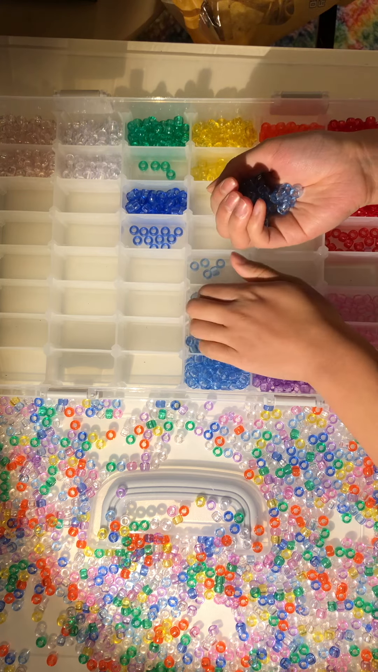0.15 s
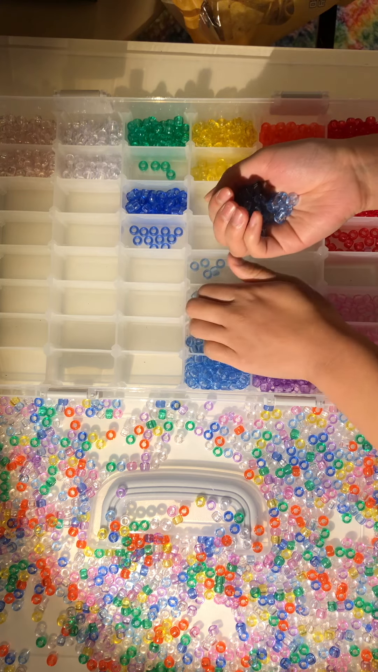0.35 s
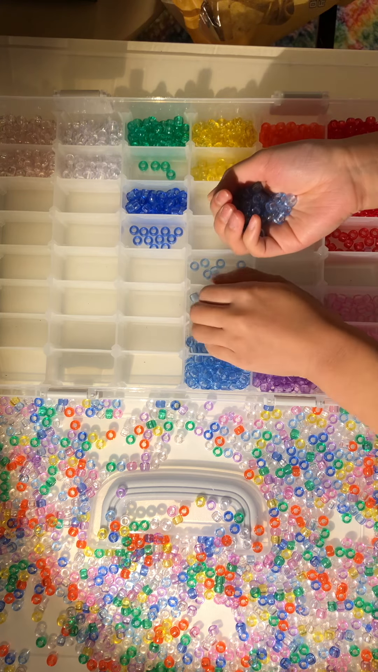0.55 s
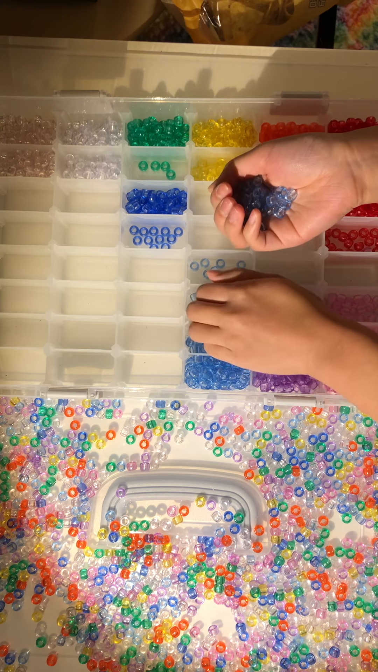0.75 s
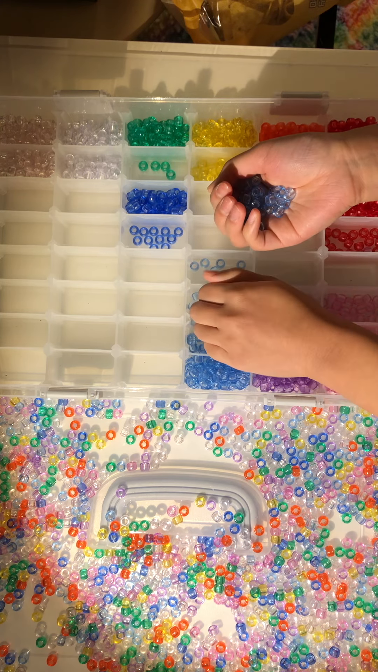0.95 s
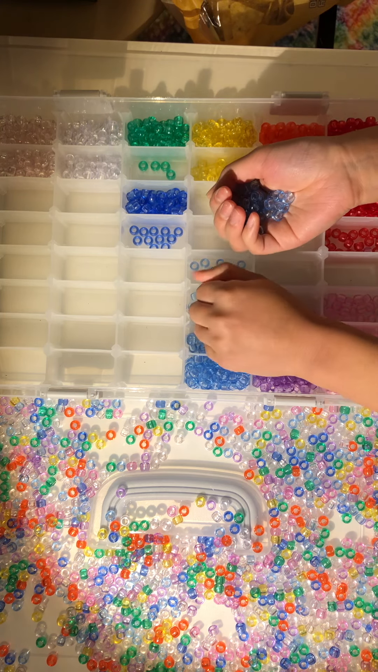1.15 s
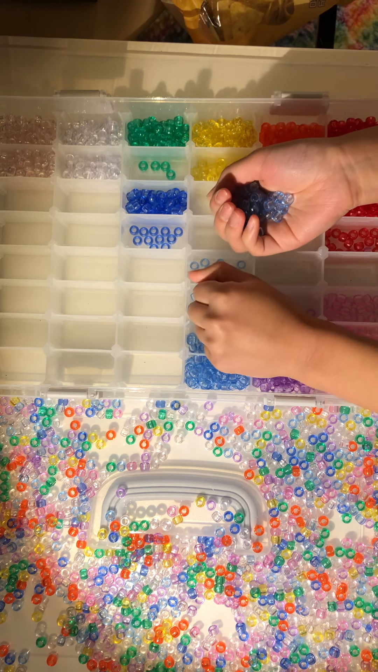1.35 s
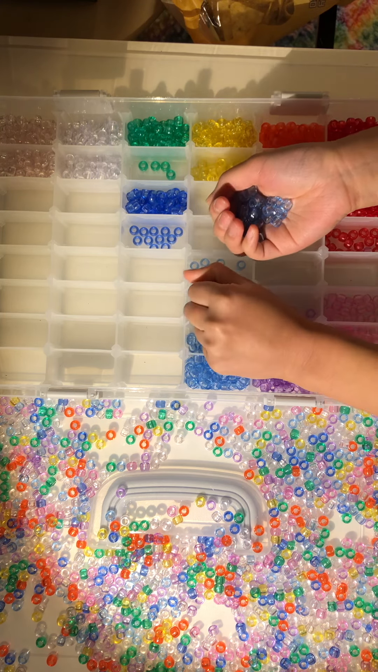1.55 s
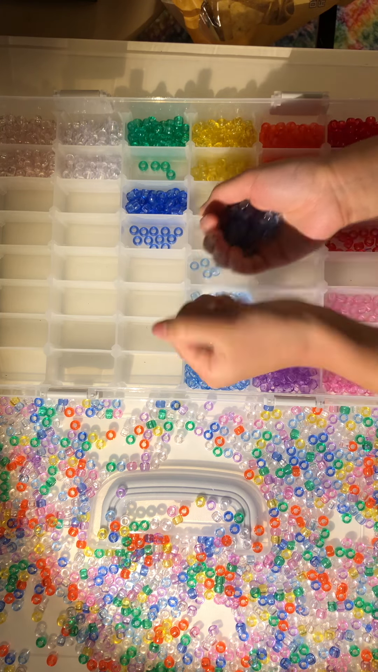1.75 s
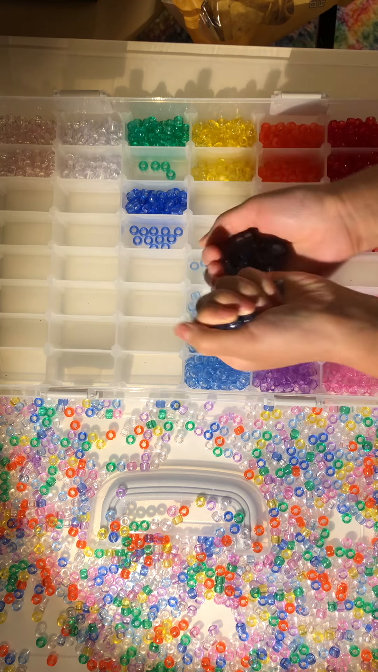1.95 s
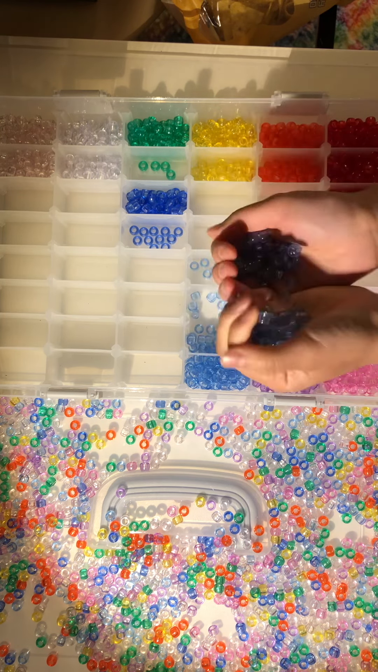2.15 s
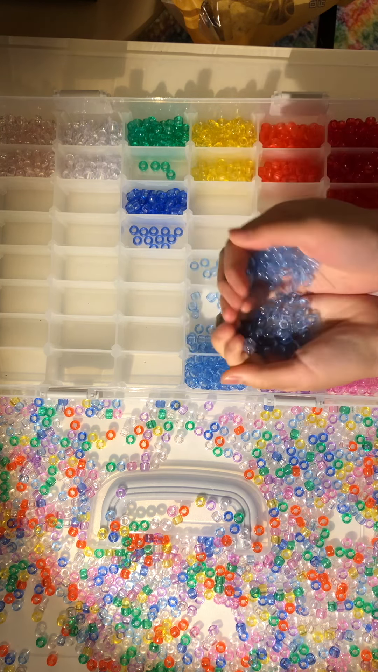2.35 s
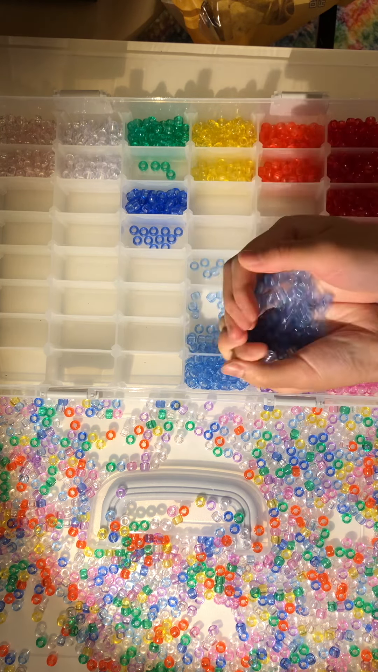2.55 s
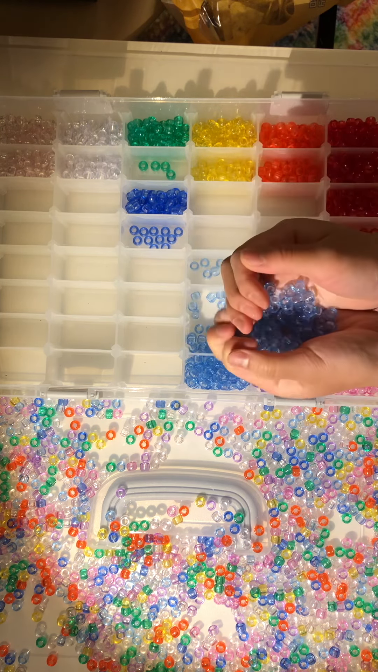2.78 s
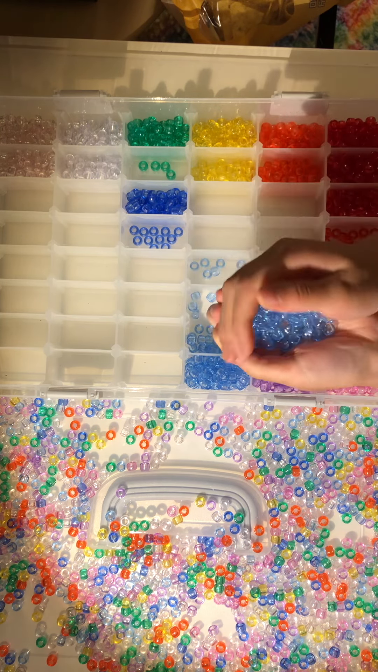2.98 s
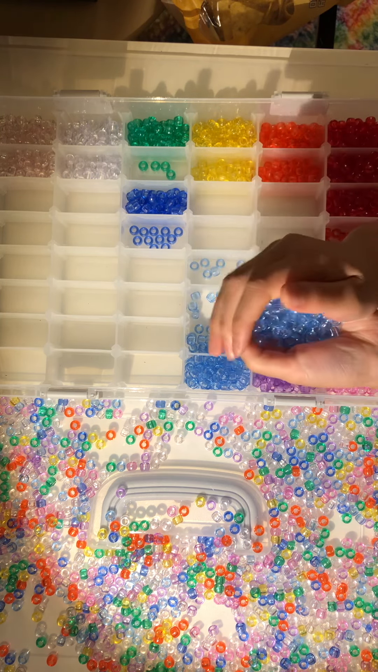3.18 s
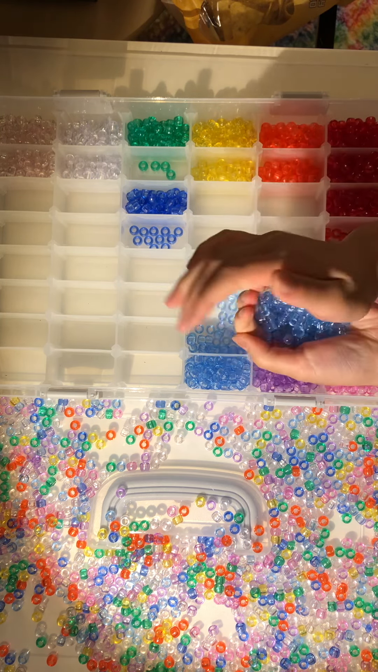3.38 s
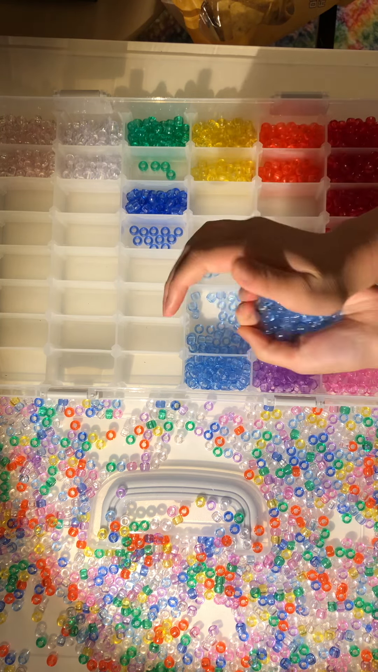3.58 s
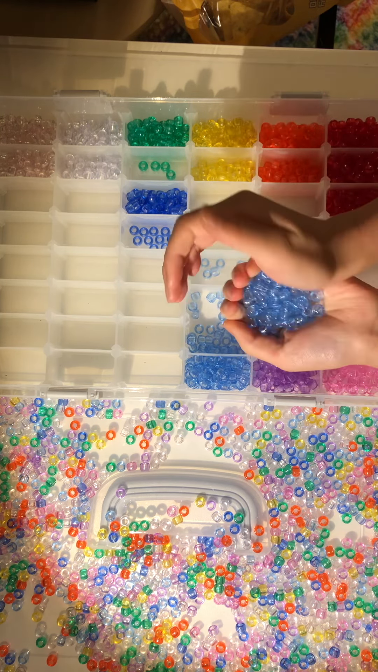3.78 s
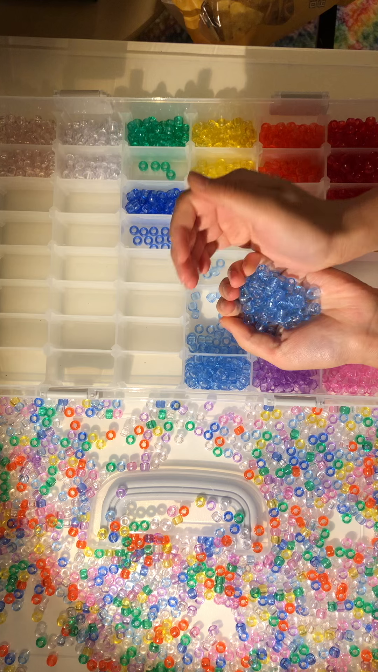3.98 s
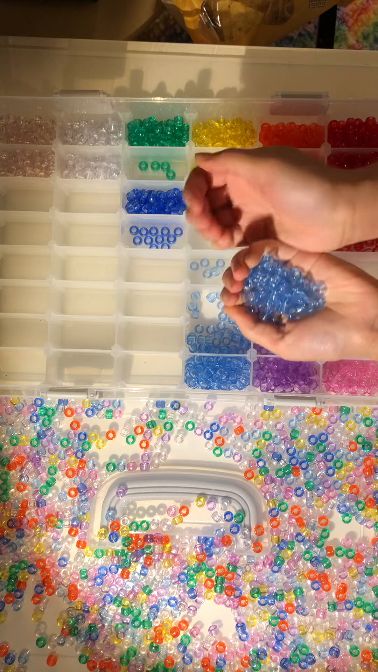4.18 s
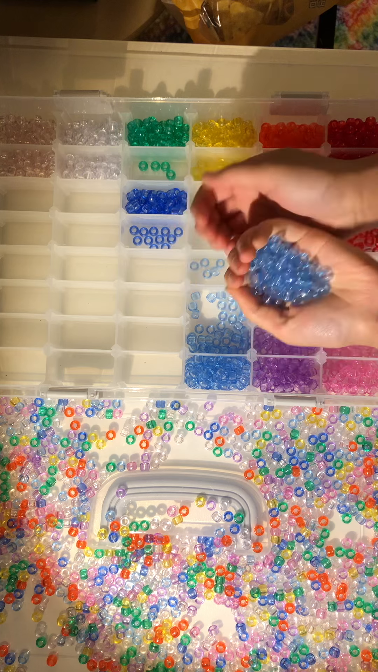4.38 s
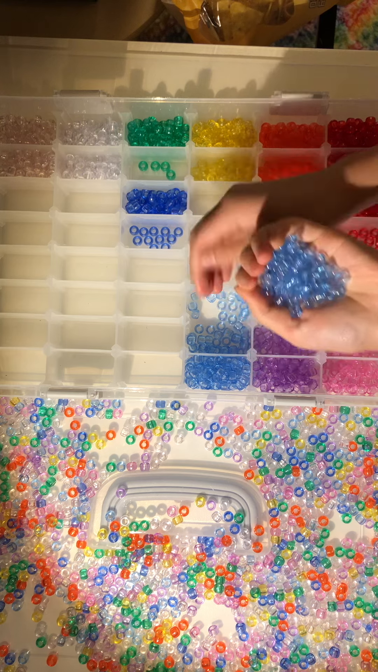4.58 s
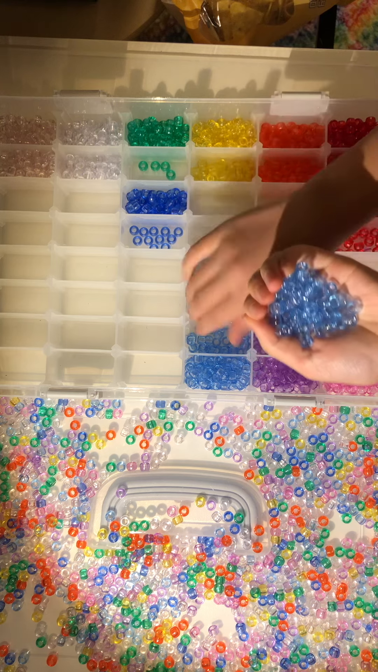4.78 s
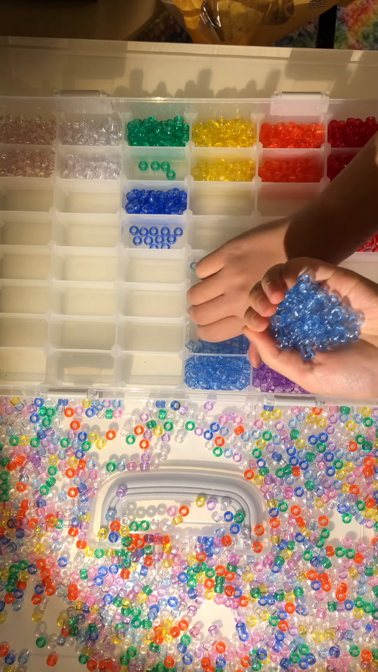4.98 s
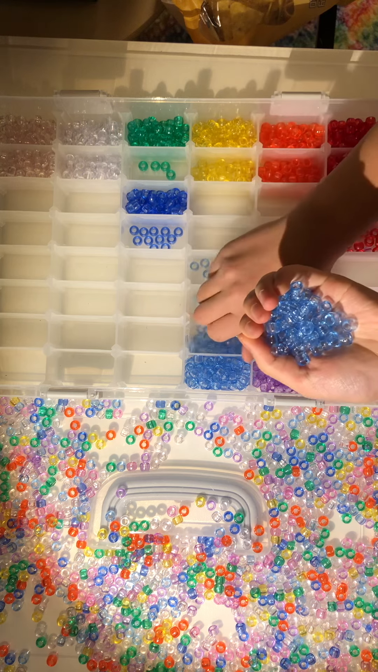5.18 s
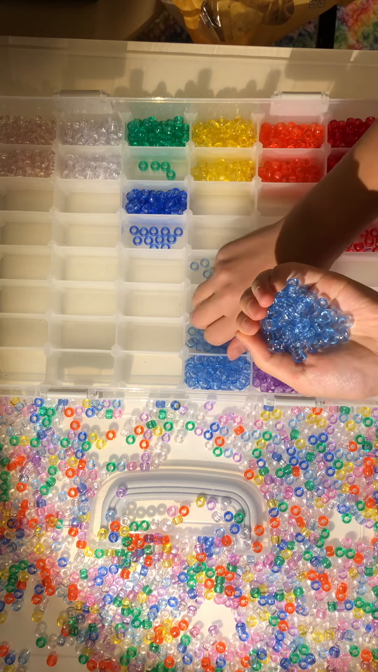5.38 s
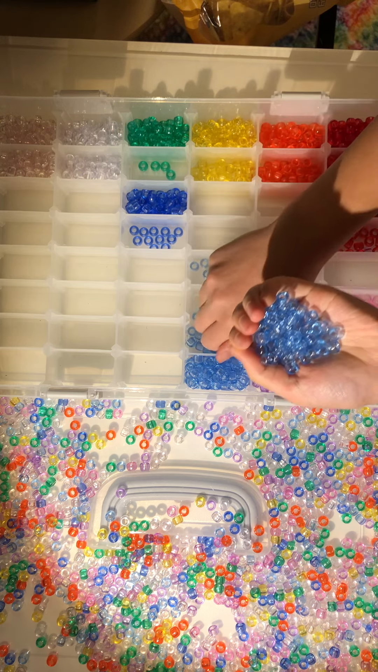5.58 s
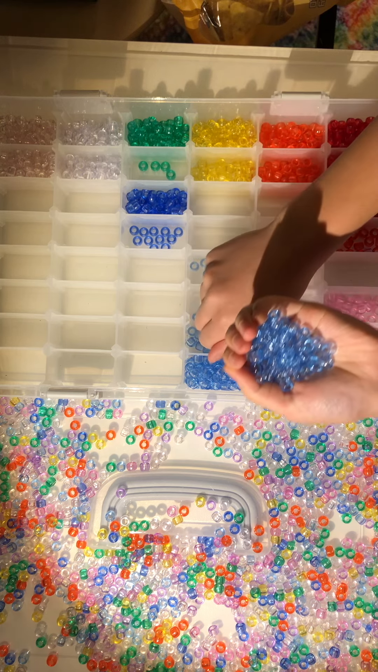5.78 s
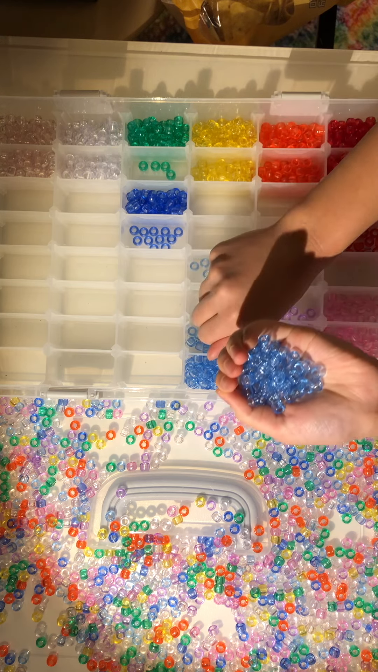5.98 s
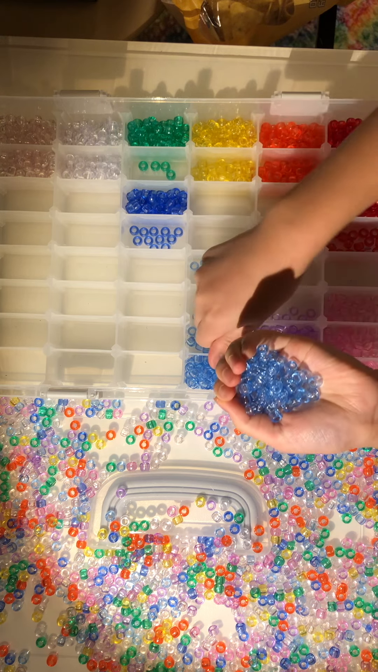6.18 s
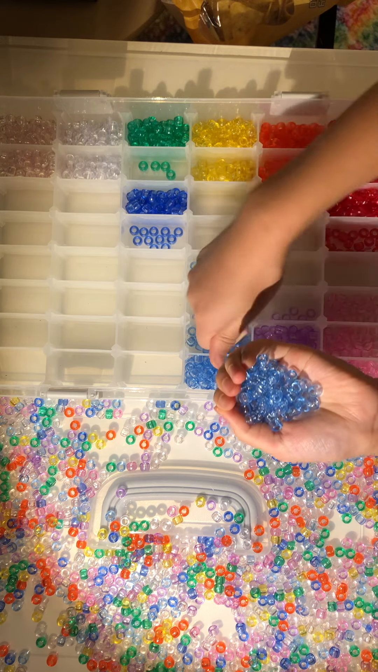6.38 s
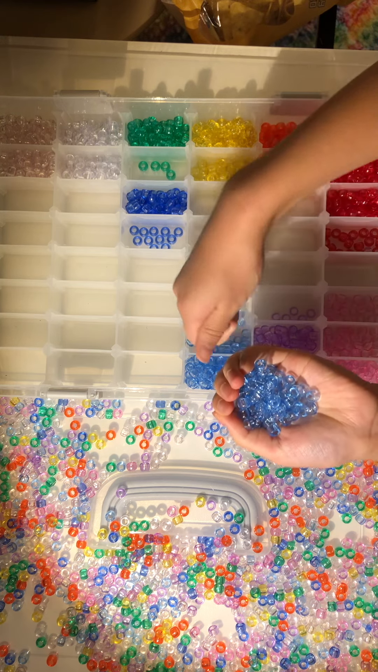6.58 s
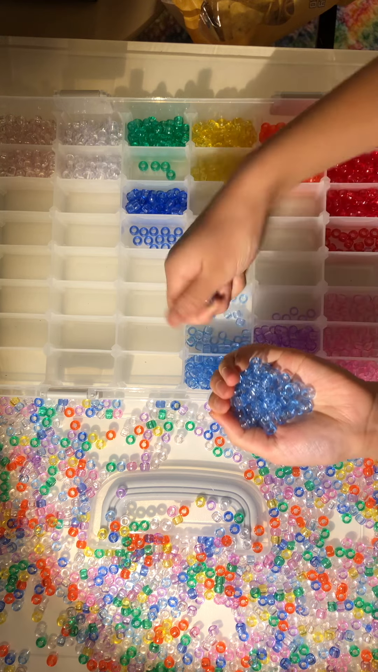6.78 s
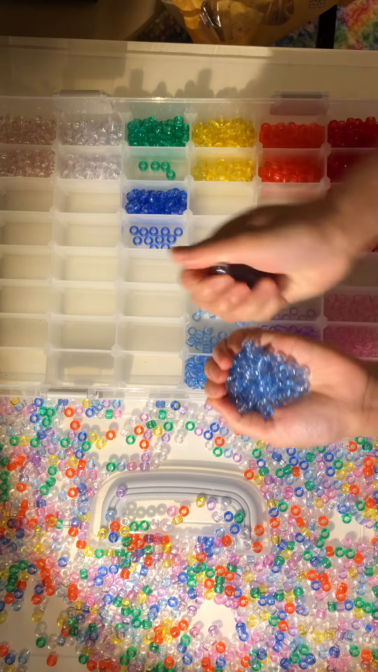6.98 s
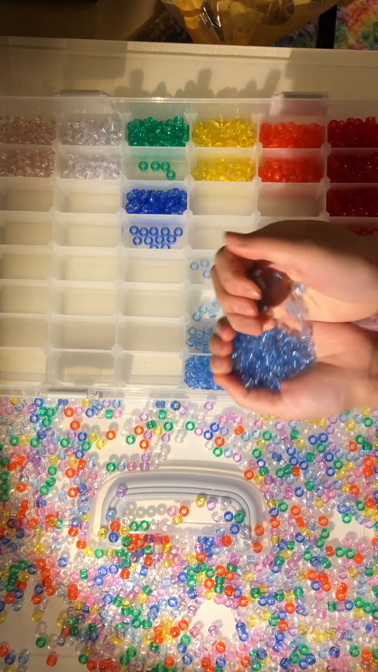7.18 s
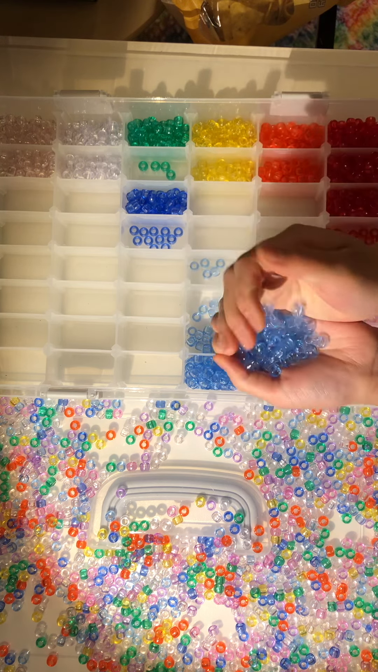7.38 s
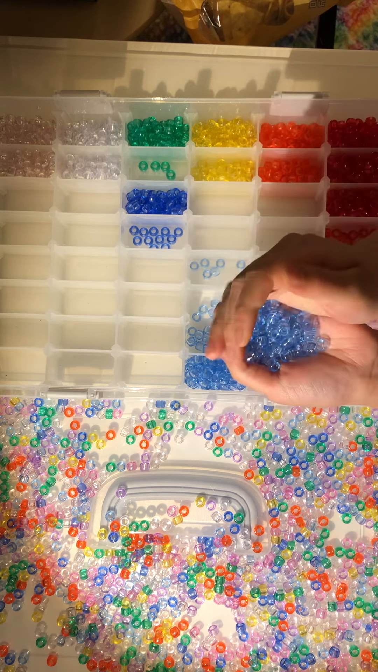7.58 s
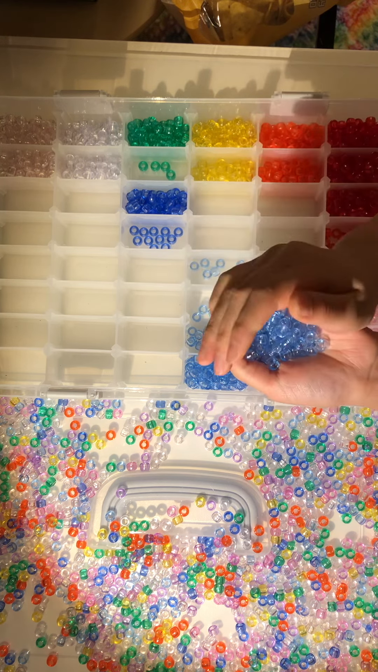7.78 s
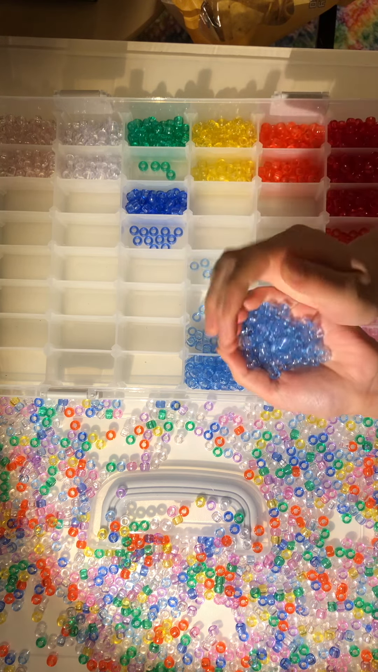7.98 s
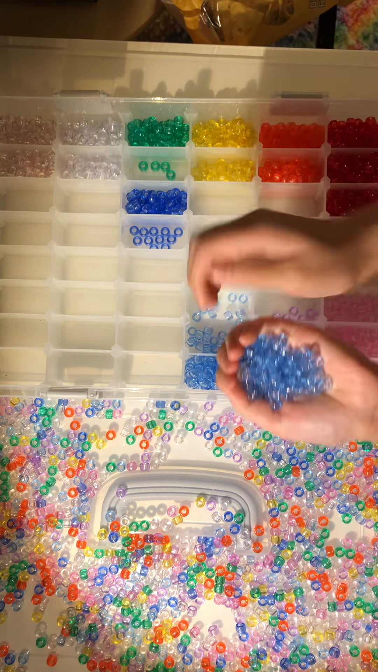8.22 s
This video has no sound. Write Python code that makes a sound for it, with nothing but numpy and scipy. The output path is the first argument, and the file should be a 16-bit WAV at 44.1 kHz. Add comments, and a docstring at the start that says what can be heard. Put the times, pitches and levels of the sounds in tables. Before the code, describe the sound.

Small plastic beads click and rattle as fingers rake them from a thin plastic box, then trickle softly between cupped palms in a quiet room.

```python
"""In a small quiet room, fingers dig small plastic beads out of a thin box's compartments and pour them between palms.
Each contact is a bright noise tick; beads that strike the box also send a noise knock through its wall resonances.
Swarms of small contacts fill in the raking and pouring, and skin rubs along the box.
The hand bumps the table now and then; short diffuse tails answer the beads, over hiss and a faint wavering hum."""
import sys
import numpy as np
from scipy import signal
from scipy.fft import rfft, irfft, next_fast_len
from scipy.io import wavfile

SR = 44100
rng = np.random.default_rng(int(sys.argv[2]) if len(sys.argv) > 2 else 0)


def dump(signal):
    """Clip the signal to [-1, 1] and save it as 16-bit WAV at the path in sys.argv[1]."""
    limited = np.clip(np.atleast_2d(signal).T, -1, 1)
    pcm = np.round(limited * 32767).astype(np.int16)
    wavfile.write(sys.argv[1], SR, pcm)


N = 363818  # length [samples]

# clearest knocks of beads in the box: (time [s], tick energy [dB], box knock energy [dB])
BOX_CONTACTS = [(.022, -15, -15.5), (.104, -15, -11.5), (.1876, -16, -9.5), (.2494, -24, -17),
                (.3045, -31.5, -13), (.3837, -32.5, -12.5), (.42, -53, -16.5), (.4783, -35.5, -13.5),
                (.5168, -27, -27), (.5412, -17.5, -27), (.5578, -14, -24), (.6028, -20, -26.5),
                (.667, -33, -8), (.7105, -28, -9.5), (.7532, -12, -4), (.7776, 2, -8), (.785, -3.5, -5.5),
                (.8075, -5, -11.5), (.8227, 3.5, -7.5), (.8311, -5.5, 3.5), (.8864, -4.5, -15),
                (.9295, -9.5, -18), (.9666, -16.5, -17), (1.0068, -17.5, -6.5), (1.0186, -15.5, -7.5),
                (1.0276, -4.5, -7), (1.0498, -11.5, -16), (1.0808, -13.5, -2.5), (1.1524, -13.5, -11),
                (1.1722, -15.5, -20), (1.2822, -20.5, -16.5), (1.3969, -2.5, -7.5), (1.4163, -4.5, -5),
                (1.4417, -11.5, -18), (1.4609, -18.5, -7.5), (1.4756, -15.5, -9.5), (1.5265, -20.5, -15.5),
                (1.5726, -13, 8.5), (1.5999, -8, -6), (1.6178, -6, -7), (1.705, -10, -5.5),
                (1.7138, -4, -5), (1.8573, -21.5, -23.5), (4.549, -22.5, -36), (4.708, -40, -5),
                (4.8167, -5.5, -5.5), (4.8294, -2.5, -11.5), (4.8447, -6.5, -10), (4.8646, -7, -10),
                (4.9213, -15.5, -12), (4.9563, -25.5, -6), (4.9672, -10, -7), (4.9743, -2, -1),
                (5.0329, -8.5, -5), (5.0589, -4.5, -6), (5.15, -13, 6.5), (5.1938, -15, -10),
                (5.235, -5.5, -5.5), (5.2915, -14.5, -31.5), (5.3039, -11.5, -13.5), (5.3615, -19, -14.5),
                (5.377, -14, -10), (5.395, -2.5, -9.5), (5.4454, -5, -12.5), (5.5036, -14, -12),
                (5.529, -12, -7), (5.5435, 0, -3), (5.6114, -20.5, -43.5), (5.6675, -14, -6.5),
                (5.7651, -7, -46.5), (5.8995, 3.5, 1.5), (5.9278, -12, -14.5), (6.049, -49, -15),
                (6.1279, -27.5, -1), (6.166, -53, -7), (6.212, -40, -17.5), (6.2377, -9.5, -15),
                (6.267, -21.5, -18), (6.2842, -23.5, -24), (6.3375, -26.5, -17.5), (6.3603, -32, -21.5),
                (6.52, -67, -27), (6.636, -49.5, -27)]
# clearest ticks of beads held in the hands: (time [s], tick energy [dB])
HELD_TICKS = [(1.9251, -10), (1.9671, -21.5), (2.0737, -10.5), (2.1225, -21.5), (2.1779, -20.5),
              (2.231, -22.5), (2.3509, -28.5), (2.4189, -22.5), (2.4721, -22.5), (2.5476, -12),
              (2.5653, -19.5), (2.5971, -16), (2.6641, -21), (2.7383, -17), (2.7658, -9.5), (2.937, -15.5),
              (2.9535, -15), (3.0445, -17.5), (3.0721, -25.5), (3.1601, -17), (3.1742, -21), (3.2278, -20),
              (3.2648, -20), (3.2938, -24.5), (3.3498, -26), (3.4415, -29.5), (3.5163, -15.5),
              (3.5852, -18), (3.6108, -22.5), (3.6503, -24), (3.7417, -23.5), (3.8309, -30),
              (3.8643, -33.5), (4.1167, -36), (4.1686, -39), (4.2331, -37), (4.4826, -18.5),
              (4.5008, -23.5), (4.6879, -26), (6.85, -40), (6.9012, -40.5), (6.946, -27.5), (7.0564, -14.5),
              (7.083, -23.5), (7.126, -28.5), (7.1778, -19.5), (7.2065, -10.5), (7.2567, -15.5),
              (7.2902, -10), (7.3197, -13), (7.3336, -14.5), (7.3548, -9), (7.3588, -9.5), (7.3877, -13.5),
              (7.402, -9), (7.4458, -6.5), (7.5222, -22.5), (7.5491, -32), (7.5762, -21.5), (7.8657, -36.5),
              (8.0807, -34), (8.1485, -32)]
HELD_DB = -26  # how faintly the box answers beads held above it


def beads():
    """Every bead contact excites two sounds: a bead-on-bead tick and a knock on the box."""
    held = [(time, db, db + HELD_DB) for time, db in HELD_TICKS]
    times, tick_db, knock_db = np.transpose(sorted(BOX_CONTACTS + held))
    swarm_ticks_db, swarm_knocks_db = heap_levels()
    ticks = bead_ticks(times, tick_db, knock_db, swarm_ticks_db, swarm_knocks_db)
    return ticks + box_knocks(times, tick_db, knock_db, swarm_knocks_db)


# colour of bead on bead: (frequency [Hz], relative level [dB per Hz])
TICK_COLOUR = [(700, -41), (1500, -33), (1790, -19.5), (2270, -21.5), (3000, -10.5), (3900, -10),
               (5000, -3), (7100, -1.5), (8500, -0.5), (9700, -0.5), (14800, -5), (16000, -4)]


def bead_ticks(times, tick_db, knock_db, swarm_ticks_db, swarm_knocks_db):
    """A tick is a hard snap, then the bead chatters against its neighbours."""
    # 0..1: the stronger the knock against the tick, the longer the snap and the louder the chatter
    deep = np.clip((knock_db - tick_db + 28) / 22, 0, 1)
    snap = bursts(times, tick_db, t60=.0025 + .003 * deep, size=300)
    chatter = bursts(times, tick_db - 7 + 5 * deep, t60=.022, size=1000, rise=1e-3)
    rattle = amp(swarm_ticks_db) * swarm(count=7000, spread_db=4.0, t60=0.0054)
    ticks = filtered(snap + chatter + rattle, keep_power(causal(TICK_COLOUR)))
    # strong swarm knocks mean a hand in the compartment, which shades the ticks
    shade = np.clip((swarm_knocks_db - swarm_ticks_db + 18) / 16, 0, 1)
    return (1 - shade) * ticks + shade * filtered(ticks, muffle(corner_hz=16300))


# walls and air of the compartments: (frequency [Hz], width [Hz], relative level [dB])
BOX_MODES = [(345.4, 500, -14), (600, 510, -7), (1235, 280, 2.5), (1742, 210, 5), (2620, 930, 0.5),
             (3900, 970, 2), (6400, 1500, -3)]


def box_knocks(times, tick_db, knock_db, swarm_knocks_db):
    """Short noisy forces ring the walls and air of the compartments."""
    blows = bursts(times, knock_db, t60=0.026, size=1000, rise=0.00061)
    stir = amp(swarm_knocks_db) * swarm(count=5000, spread_db=3.0, t60=0.018)
    force = blows + stir
    # knocks with hardly any tick are soft fingertips, which stir mostly the low modes
    softness = np.clip((knock_db - tick_db - 14.0) / 9, 0, 1)
    soft = np.interp(np.arange(N) / SR, times, softness)
    force = (1 - soft) * force + filtered(soft * force, muffle(corner_hz=1620))
    return filtered(force, keep_power(resonances(BOX_MODES)))


# fingers rake the heap: (peak time [s], stroke length [s], peak ticks [dB rms], peak box knocks [dB rms])
RAKE_STROKES = [(0, .08, -33.5, -31), (0.173, .13, -44.5, -40), (0.377, 0.13, -85, -47),
                (0.544, 0.082, -61, -38.5), (0.663, .1, -62, -34), (0.821, 0.1, -25, -25.5),
                (1.036, .1, -42, -41.5), (1.2, 0.33, -60.5, -49), (1.469, .1, -47.5, -45),
                (1.636, 0.069, -45, -39.5), (1.75, 0.13, -53, -57.5), (3.472, 0.13, -72.5, -63),
                (4.58, .12, -53.5, -68), (4.722, .12, -77.5, -57), (4.87, 0.053, -46.5, -39),
                (5.02, .1, -43.5, -39.5), (5.147, 0.11, -29, -28), (5.4, 0.076, -38, -35),
                (5.561, 0.18, -44, -41.5), (5.768, 0.09, -61.5, -42.5), (5.97, .08, -53.5, -69.5),
                (6.1, 0.078, -80, -42.5), (6.303, 0.069, -57.5, -49.5), (6.495, 0.13, -94, -61),
                (6.641, .06, -75, -54.5)]
SWELL_DB, FADE_DB = 19.5, 16  # level lost one stroke length before and after the peak
# beads trickling between the palms: (time [s], ticks [dB rms])
PALM_POUR = [(1.8, -88.5), (2.0, -52.5), (2.25, -49.5), (2.4, -60.5), (2.57, -39), (2.75, -55.5),
             (3.0, -50), (3.35, -63.5), (3.498, -53), (3.62, -70.5), (3.999, -86), (4.4, -72), (4.6, -94),
             (6.8, -95.5), (7.0, -66.5), (7.2, -63.5), (7.47, -49), (7.559, -68), (7.901, -89),
             (8.1, -68.5), (8.25, -89)]


def heap_levels():
    """Levels [dB] of the small ticks and knocks: rake strokes swell and fade, pouring adds its power."""
    t = np.arange(N) / SR
    times, pour_db = np.transpose(PALM_POUR)
    tick_and_knock_db = np.interp(t, times, pour_db) + np.array([[0], [HELD_DB]])
    power = amp(tick_and_knock_db) ** 2
    for peak, length, *peak_db in RAKE_STROKES:
        late = (t - peak) / length  # in stroke lengths, negative before the peak
        drop_db = np.maximum(FADE_DB * late, -SWELL_DB * late)
        power = power + amp(np.reshape(peak_db, (2, 1)) - drop_db) ** 2
    return 10 * np.log10(power)


# skin rubs along the box: (start time [s], length [s], level at the crest [dB rms])
SKIN_RUBS = [(0.394, 0.04, -57), (4.531, 0.15, -61.5), (4.681, .035, -53), (6.04, 0.12, -59)]


def rubs():
    """Fingers sliding on plastic: soft grains through one broad resonance swell and fade."""
    t = np.arange(N) / SR
    swell = np.zeros(N)
    for start, length, db in SKIN_RUBS:
        swell += amp(db) * np.sin(np.pi * np.clip((t - start) / length, 0, 1))
    grain = swarm(count=2500, spread_db=-1.0, t60=0.0086)
    return swell * unit(filtered(grain, resonances([(1060, 600, 0)])))


# the hand bumps the table through the box: (time [s], energy [dB])
TABLE_BUMPS = [(.01, -23), (.83, -25), (4.872, -25), (4.976, -15.5), (5.151, -17.5), (5.392, -25.5),
               (5.549, -25), (6.148, -26)]
# resonances of the table: (frequency [Hz], width [Hz], relative level [dB])
TABLE_MODES = [(60, 100, -2.5), (143, 23, 4.5), (330, 150, -8.5)]


def table():
    """Soft, slowly rising pushes ring the low modes of the table top."""
    times, db = np.transpose(TABLE_BUMPS)
    pushes = bursts(times, db, t60=.16, size=6000, rise=.008)
    return filtered(pushes, keep_power(resonances(TABLE_MODES)))


# decay of the room: (frequency [Hz], time to fall 60 dB [s])
ROOM_DECAY = [(300, 0.096), (2000, 0.28), (6000, 0.15), (15000, 0.049)]


def room(x):
    """Each eighth of a second gets its own diffuse noise tail; the middle rings longest, the top dies first."""
    out, step = np.zeros(N + SR), SR // 8
    for start in range(0, N, step):
        hz, t, noise = signal.stft(rng.standard_normal(SR // 2), SR, nperseg=128)
        decay = amp(-60 * t / along(ROOM_DECAY, hz)[:, None])
        tail = signal.istft(noise * decay, SR, nperseg=128)[1]
        wet = signal.fftconvolve(x[start:start + step], tail / np.linalg.norm(tail))
        out[start + 200:][:len(wet)] += wet  # 200 samples of delay before the tail
    return out[:N]


# colour of the room noise: (frequency [Hz], relative level [dB per Hz])
AIR_COLOUR = [(15, -49.5), (25, 7), (84, -7), (185, -9), (223, -6), (560, -10), (641, -12.5), (1100, -17),
              (2220, -22), (6210, -26), (16000, -29.5)]
# the hum wavers around these: (frequency [Hz], width [Hz], relative level [dB])
HUM_MODES = [(96, 5.3, 4), (180, 23, -2)]


def air():
    """Steady coloured noise, with a hum that wavers because it is noise in narrow resonances."""
    hiss = filtered(rng.standard_normal(N), lambda hz: amp(along(AIR_COLOUR, hz)))
    hum = filtered(rng.standard_normal(N), resonances(HUM_MODES))
    return amp(-68.5) * unit(hiss) + amp(-72.0) * unit(hum)


def bursts(times, db, t60, size, rise=1e-4):
    """A dying noise burst of energy db at each time [s]; each decay time t60 [s] varies at random."""
    draw = rng.standard_normal((len(times), size + 1))
    t = np.arange(size) / SR
    life = np.reshape(t60, (-1, 1)) * np.exp(0.2 * draw[:, :1])
    rows = draw[:, 1:] * amp(-60 * t / life) * (1 - np.exp(-t / rise))
    rows *= amp(db)[:, None] / np.linalg.norm(rows, axis=1, keepdims=True)
    at = np.round(times * SR).astype(int)[:, None] + np.arange(size)
    return np.bincount(at.ravel(), rows.ravel(), N + SR)[:N]  # overlapping bursts add


def swarm(count, spread_db, t60):
    """Contacts at random times, rms 1: many weak and few strong, or few weak if spread_db is negative."""
    place, luck = rng.random((count, 2)).T
    db = -spread_db * np.log(1 - .99 * luck)
    return unit(bursts(place * N / SR, db, t60, size=240))


def resonances(modes):
    """The causal response of (Hz, width, dB) modes, summed with alternating signs."""
    def response(hz):
        total = 0
        for k, (centre, width, db) in enumerate(modes):
            damping = 1j * hz * width
            total = total + (-1) ** k * amp(db) * damping / (centre ** 2 - hz ** 2 + damping)
        return total
    return response


def causal(spectrum):
    """The minimum-phase response with this colour: it starts at once."""
    def response(hz):
        cepstrum = irfft(np.log(np.maximum(amp(along(spectrum, hz)), 1e-4)))
        # fold the second half onto the first
        cepstrum[1:len(cepstrum) // 2] *= 2
        cepstrum[len(cepstrum) // 2:] = 0
        return np.exp(rfft(cepstrum))
    return response


def muffle(corner_hz):
    """A gentle two-pole loss of treble."""
    return lambda hz: 1 / (1 + 1j * hz / corner_hz) ** 2


def keep_power(response):
    """The response scaled to pass white noise at unchanged power."""
    def scaled(hz):
        gain = response(hz)
        return gain / np.sqrt(np.mean(np.abs(gain) ** 2))
    return scaled


def filtered(x, response):
    """x through a complex response of frequency, padded so that its ringing does not wrap round."""
    size = next_fast_len(N + SR // 2)
    return irfft(rfft(x, size) * response(np.fft.rfftfreq(size, 1 / SR)), size)[:N]


def along(points, hz):
    """(Hz, value) points read on a log frequency axis."""
    f, value = np.transpose(points)
    return np.interp(np.log(hz + 1), np.log(f + 1), value)


def amp(db):
    """Decibels to gain."""
    return 10 ** (np.asarray(db) / 20)


def unit(x):
    """Scaled to rms 1."""
    return x / np.sqrt(np.mean(x ** 2) + 1e-20)


def scene():
    """Beads and rubs with their room tails, over table bumps and room noise."""
    near = beads() + rubs()
    return (near + amp(-10) * room(near) + table() + air())[None]


TOP_HZ = 15850  # band limit of the recorder


def record(dry):
    """The recorder drops the deepest bass and keeps nothing above its band limit."""
    return filtered(dry[0], lambda hz: (hz < TOP_HZ) * hz ** 6 / (hz ** 6 + 40.6 ** 6))[None]


dry = scene()
out = record(dry)
dump(out)
```